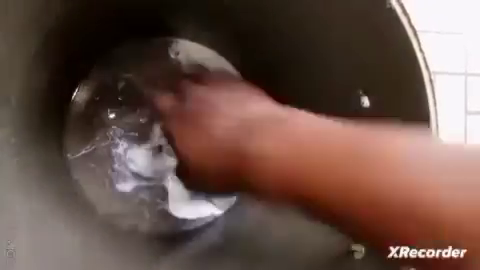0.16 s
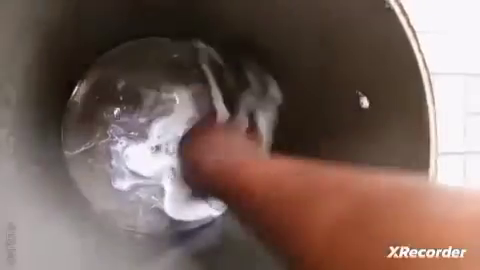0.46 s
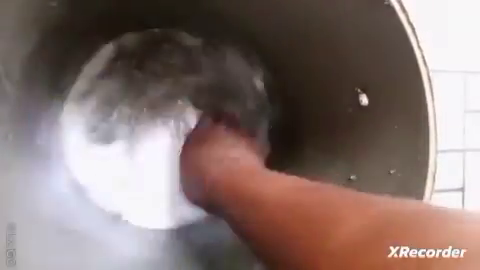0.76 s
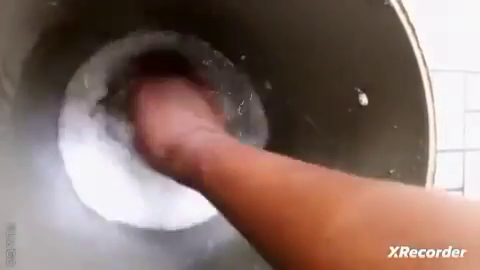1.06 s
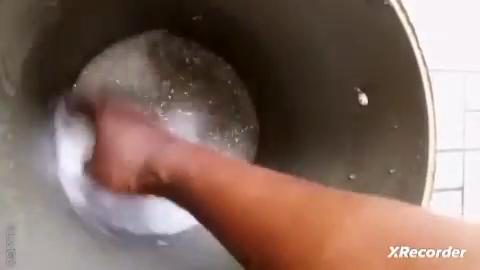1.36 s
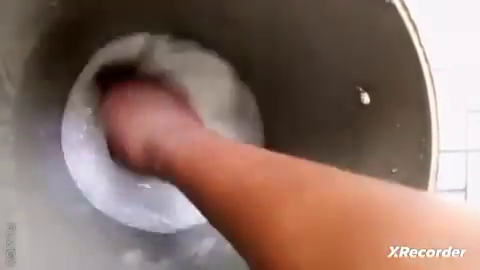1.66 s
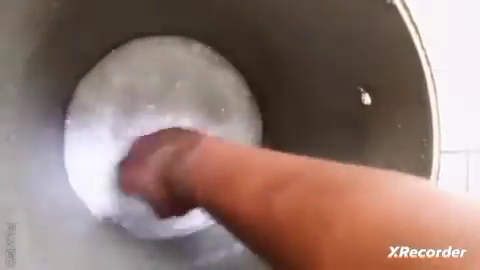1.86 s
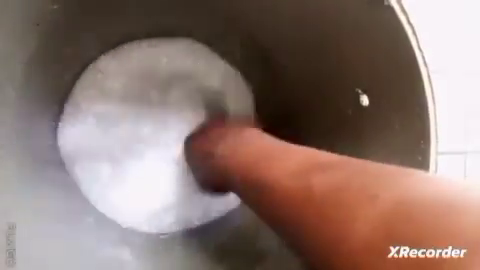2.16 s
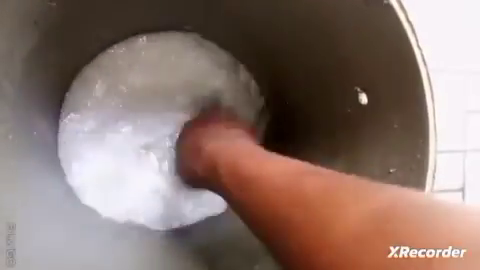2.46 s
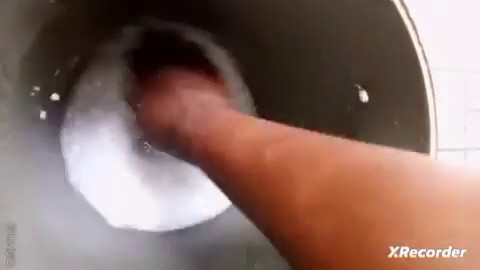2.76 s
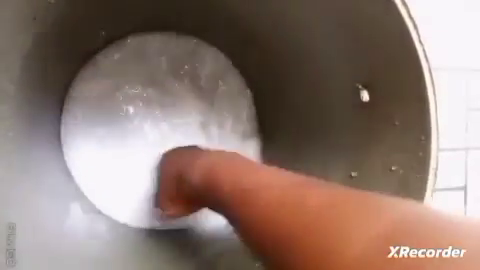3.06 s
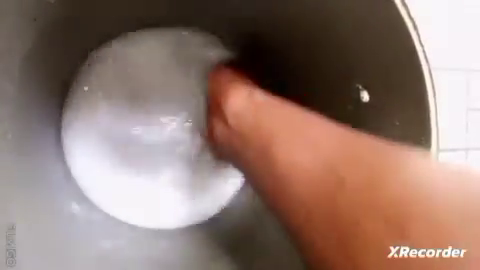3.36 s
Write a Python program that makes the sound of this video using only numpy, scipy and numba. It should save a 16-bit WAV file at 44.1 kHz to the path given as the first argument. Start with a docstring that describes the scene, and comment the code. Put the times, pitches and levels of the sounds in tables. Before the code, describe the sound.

Hand stirring shallow water in a bucket, bubbly sloshing and splashing with small hollow bumps

```python
"""Hand stirring water in a bucket

A hand plunges into shallow water in a plastic bucket and stirs: swarms and single glides of decaying sines chirp
and pop as bubbles, random clicks crackle as spray, and knuckles ring the bucket's modes; slosh keeps it booming.
Short wall echoes follow the bubbles. Faint outdoor noise and breathy tones, alone before the plunge, lie beneath."""
import sys
import numpy as np
from scipy import signal
from scipy.fft import rfft, irfft
from scipy.io import wavfile
from scipy.ndimage import uniform_filter1d, minimum_filter1d
from numba import njit

SR = 44100
rng = np.random.default_rng(int(sys.argv[2]) if len(sys.argv) > 2 else 0)


def boost(x):
    """Linear amplitude factor 10**(x/20) for a level x in decibels (scalar or array-like)."""
    u = np.asarray(x, float) / 20
    return 10 ** u


def store_pcm(level_fs):
    """Save levels as 16-bit WAV."""
    pcm = np.round(np.clip(level_fs, -1, 1) * 32767).astype(np.int16)
    wavfile.write(sys.argv[1], SR, np.atleast_2d(pcm).T)


N = 154350
PLUNGE_S, PLUNGE_RISE_S = 0.328, 0.003
GLIDE = 0.14  # pitch rise per third of t60, before its random factor


def unit(x):
    """Scale to rms 1."""
    return x / np.sqrt(np.mean(x ** 2))


def band(x, hz, width_hz):
    """Resonance of gain 1 at its centre."""
    return signal.lfilter(*signal.iirpeak(hz, hz / width_hz, fs=SR), x)


def colour(x, table):
    """Minimum-phase filter with the gain of (frequency [Hz], gain [dB]) points."""
    hz, db = np.array(table, float).T
    grid_hz = np.linspace(1, SR / 2, 2049)
    log_gain = np.interp(np.log(grid_hz), np.log(hz), db) * np.log(10) / 20
    cepstrum = irfft(log_gain)
    cepstrum[1:2048] *= 2  # fold the anticausal half forward
    cepstrum[2049:] = 0
    impulse = irfft(np.exp(rfft(cepstrum)))[:2048]
    return signal.fftconvolve(x, impulse)[:N]


def walk(rate_hz):
    """Random levels held 1 / rate_hz and slewed; rms 1."""
    hold = int(SR / rate_hz)
    steps = np.repeat(rng.standard_normal(N // hold + 1), hold)
    return unit(uniform_filter1d(steps, hold // 2)[:N])


def sizes(u, spread_db):
    """Uneven event sizes from uniform u: mostly small, a few large."""
    return boost(-spread_db * np.log(np.maximum(u, 0.01)))


def crackle(per_s, spread_db):
    """Single clicks of random time, sign and size; rms 1."""
    u = rng.random((N, 3))
    hit = u[:, 0] < per_s / SR
    sign = np.sign(u[:, 1] - 0.5)
    return unit(hit * sign * sizes(u[:, 2], spread_db))


def bursts(start_s, db, t60_s, rise_s):
    """Envelope that jumps at each event and decays exponentially."""
    hits = np.zeros(N)
    hits[(start_s * SR).astype(int)] = boost(db)
    decay = signal.lfilter([1], [1, -1000 ** (-1 / SR / t60_s)], hits)
    k = np.exp(-1 / (rise_s * SR))
    return signal.lfilter([1 - k], [1, -k], decay)


def level(table, column):
    """Gain along one dB column of a time table; silent before the plunge."""
    t, rows = np.arange(N) / SR, np.array(table)
    db = np.interp(t, rows[:, 0], rows[:, column])
    return boost(db) * np.clip((t - PLUNGE_S) / PLUNGE_RISE_S, 0, 1) ** 2


@njit
def rings(start, hz, t60, size, glide, onset, n, sr):
    """Decaying sines that swell with time constant onset and glide in pitch as they fade."""
    out = np.zeros(n)
    for e in range(len(start)):
        i0, m = int(start[e] * sr), int(t60[e] * sr) + 2
        turn = np.exp(2j * np.pi * hz[e] / sr - np.log(1000.) / m)  # rotation and decay per sample
        bend = np.exp(2j * np.pi * hz[e] * glide[e] * 3 / sr / m)
        z, swell = size[e] + 0j, 0.
        for i in range(max(i0, 0), min(i0 + m, n)):
            swell += (1 - swell) / (1 + onset * sr)
            out[i] += swell * z.imag
            z *= turn
            turn *= bend
    return out


def ring(start_s, hz, t60_s, size, glide, onset_s):
    """One decaying sine per row; for glide > 0 most rise in pitch, some sag."""
    glides = glide * rng.uniform(-0.8, 1.2, len(hz))
    t60_s = np.clip(t60_s, 0.001, 1.)
    return rings(1. * start_s, 1. * hz, t60_s, 1. * size, glides, onset_s, N, float(SR))


# churning water: (time [s], large bubbles [dB], small bubbles [dB], spray treble [dB])
STIR = [(0.34, -15.5, -22, -59), (0.375, -28, -18.5, -32), (0.412, -34, -13.5, -40),
        (0.43, -25.5, -25.5, -52), (0.52, -17.5, -18.5, -44), (0.72, -21, -15, -42),
        (0.9, -26.5, -25.5, -48.5), (1.05, -25.5, -19, -44), (1.35, -24, -21.5, -47.5),
        (1.52, -25, -20.5, -44), (1.66, -24, -21.5, -49), (1.78, -27, -20, -45), (1.9, -31, -27, -50),
        (2.02, -16, -21, -49.5), (2.12, -34.5, -27, -59), (2.2, -22, -24, -51.5),
        (2.37, -19.5, -22.5, -52.5), (2.42, -41.5, -38, -54), (2.55, -30, -27.5, -57.5),
        (2.65, -28, -19.5, -42), (2.85, -18.5, -21, -47), (2.92, -28, -29, -55), (3.08, -18, -16, -39),
        (3.225, -27, -24, -46.5), (3.29, -39.5, -33.5, -61), (3.35, -28.5, -26.5, -37.5),
        (3.4, -31.5, -38, -74), (3.5, -30, -22, -60)]
# colour of water through bucket and microphone: (frequency [Hz], density [dB per Hz])
WATER = [(240, -56.5), (400, -14), (584, -15), (782, -2), (918, -5), (1000, 0.5), (1190, -7.5), (1440, 0.5),
         (2140, -4.5), (3350, 2), (4050, -3), (7470, -35), (13000, -35.5)]


def swarm(per_s, t60_cycles, spread_db, onset_s):
    """Random bubbles ring at their pitch; large and small follow their own churning levels."""
    u = rng.random((int(per_s * N / SR), 4))
    i = (u[:, 0] * N).astype(int)
    hz = 550 * 11.74 ** u[:, 1]
    t60_s = t60_cycles / hz * (0.56 + u[:, 3])
    size = hz ** 1.134 * sizes(u[:, 2], spread_db)
    clumps = boost(3.5 * walk(40))  # shared by all sizes
    large = level(STIR, 1) * clumps * boost(2)
    small = level(STIR, 2) * clumps
    stirred = size * np.where(hz < 1800, large[i], small[i])
    steady = colour(ring(i / SR, hz, t60_s, size, GLIDE, onset_s), WATER)  # level reference
    return colour(ring(i / SR, hz, t60_s, stirred, GLIDE, onset_s), WATER) / np.std(steady)


def churn():
    """Ringing bubbles over a fizz of brief pops, high-passed."""
    ringing = swarm(per_s=2500, t60_cycles=33, spread_db=3.5, onset_s=0.0012)
    fizz = swarm(per_s=5000, t60_cycles=3, spread_db=2, onset_s=0.0001)
    foam = boost(2.5) * ringing + boost(-7) * fizz
    return signal.sosfilt(signal.butter(6, 643, "high", fs=SR, output="sos"), foam)


# loud bubbles: (time [s], level [dB], pitch [Hz])
BUBBLES = [(0.329, -7, 1746), (0.342, -10, 1480), (0.371, -8, 1790), (0.393, 2.5, 3320), (0.487, -7.5, 800),
           (0.521, -5.5, 792), (0.623, -1, 3150), (0.711, -8.5, 686), (0.762, -7, 3080), (0.828, -10, 775),
           (0.846, -3.5, 975), (0.918, -14, 1400), (0.959, 5.5, 3120), (1.003, -2.5, 2286),
           (1.058, -1.5, 3400), (1.116, -3.5, 3290), (1.138, 1, 3300), (1.177, -6, 3960), (1.218, -7, 2870),
           (1.238, -0.5, 3300), (1.28, -2.5, 3580), (1.309, -11, 757), (1.332, -4.5, 2225),
           (1.433, -2, 1700), (1.475, -12, 3350), (1.518, -4.5, 3850), (1.56, -3.5, 2500),
           (1.596, -6.5, 2510), (1.63, 2, 3790), (1.695, -5.5, 3400), (1.711, -5, 1936), (1.746, 1, 3265),
           (1.78, -2, 3360), (1.848, -4.5, 3670), (1.972, -9, 1000), (1.995, -17.5, 1110),
           (2.141, 1.5, 2950), (2.226, -1, 2800), (2.265, 0, 2390), (2.374, 3, 2940), (2.402, -5.5, 3700),
           (2.477, -11, 4580), (2.513, -7, 2020), (2.628, -2, 3580), (2.708, -7.5, 3370), (2.8, -6, 1470),
           (2.826, -9, 1020), (2.88, 2.5, 3095), (3.028, -3, 1540), (3.101, 2, 2750), (3.118, -2, 2100),
           (3.188, -11, 3176), (3.309, -15.5, 4060), (3.332, -5.5, 3400), (3.423, -5, 2810)]


def bubbles():
    """Each loud bubble rings with a slap of water and a splash of weaker neighbours that thins out."""
    s, db, hz = np.array(BUBBLES).T
    t60_s = 54 / np.sqrt(hz * 3000)  # 54 cycles at 3 kHz, more above
    loud = ring(s + 0.001053, hz, t60_s, boost(db + 6), GLIDE, 0.002)

    u = rng.random((len(s), 12, 3))
    octaves = 1.2 * (2 * u[..., 0] - 1)
    near_hz = np.clip(hz[:, None] * 2 ** octaves, 600, 4500 + 500 * u[..., 2]).ravel()
    late = u[..., 1] ** 1.5
    near_s = (s[:, None] + 0.001002 + 0.02 * late).ravel()
    near_db = (db[:, None] - 7.5 - 6.8 * u[..., 2] - 8.3 * late).ravel()

    slap = unit(band(colour(crackle(6000, 1.6), WATER), 2600., 3500.))
    slap = slap * bursts(s + 0.00106, db - 11.5, t60_s=0.038, rise_s=0.00062)
    splash = ring(near_s, near_hz, 22 / near_hz, boost(near_db), GLIDE, 0.00085)
    return loud + slap + splash


def walls(x):
    """Dense, decaying random echoes inside the bucket, added to the direct sound."""
    t = np.arange(4000) / SR
    tail = rng.standard_normal(len(t)) * 1000 ** (-t / 0.055) * (t > 0.0015)  # t60 0.055 s
    tail = tail / np.sqrt(np.sum(tail ** 2))
    return x + boost(-7.5) * signal.fftconvolve(x, tail)[:N]


# knuckles bump the bottom: (time [s], level [dB], hardness as lift of the upper modes [dB])
BUMPS = [(0.348, -24, 19.5), (0.487, -18.5, 18), (0.847, -17.5, 14), (0.922, -25, 7), (0.99, -21.5, -15),
         (1.236, -15.5, 9), (1.726, -10.5, 13), (1.967, -27, 3), (2.022, -24.5, 10), (2.281, -24, 11),
         (2.487, -16, -31), (2.619, -12, -3), (3.343, -29, -8)]
# modes of the bucket: (frequency [Hz], level [dB], t60 [s])
BUCKET = [(193, -23, 0.31), (244.9, 2, 0.19), (308, -8, 0.11), (405, -7, 0.059), (483.5, -11, 0.069),
          (734, -12.5, 0.062)]
# boom as water slops against the bucket: (time [s], level [dB])
BOOM = [(.34, -30), (.55, -27), (.74, -33.5), (.78, -41), (1.0, -38.5), (1.12, -48), (1.18, -55),
        (1.27, -36), (1.6, -36.5), (1.66, -54), (1.78, -30.5), (1.86, -72), (1.92, -51.5), (2.07, -24),
        (2.12, -43.5), (2.3, -30.5), (2.45, -45.5), (2.52, -39.5), (2.6, -46.5), (2.8, -33.5), (2.92, -39),
        (3.0, -26.5), (3.22, -40), (3.28, -71), (3.36, -35.5), (3.44, -59)]


def bucket():
    """Bumps ring all modes as decaying sines; slosh clicks keep the lowest five resonating."""
    s, db, hard_db = np.array(BUMPS).T
    bumps = 0
    for k, (hz, mode_db, t60_s) in enumerate(BUCKET):
        hit_hz = hz * (1 + 0.038 * rng.standard_normal(len(s)))
        hit_db = db - 1 + mode_db + (k > 1) * hard_db
        bumps = bumps + ring(s - 0.004, hit_hz, t60_s + 0 * s, boost(hit_db), 0, 0.0083)
    slosh = crackle(900, 3.4)
    boom = 0
    for (hz, mode_db, t60_s), lift_db in zip(BUCKET, (6.5, 2, 5, -4, -1)):
        resonance = band(band(slosh, hz, 6 / t60_s), hz, 14 / t60_s)
        boom = boom + boost(mode_db + lift_db) * resonance
    return bumps + unit(boom) * level(BOOM, 1)


# bursts of spray against the wall: (time [s], level [dB])
SPRAY = [(0.3423, -32), (0.581, -15.5), (0.643, -18), (1.0053, -16.5), (1.25, -19), (1.35, -22),
         (2.0344, -16), (2.0993, -24), (2.144, -18.5), (2.3318, -19), (2.402, -18), (2.6266, -22),
         (2.865, -23)]
# ticks of fine drops: (frequency [Hz], level [dB])
DROPLETS = [(6300, 7), (8700, -1), (9500, -2), (10500, -4), (12300, 0.5)]


def spray():
    """Fine droplets: a crackling bed and sudden bursts, lifted by the microphone port."""
    s, db = np.array(SPRAY).T
    puffs = bursts(s, db - 15.5, t60_s=0.048, rise_s=0.0023)
    port = signal.butter(3, (14370, 15740), "band", fs=SR, output="sos")
    top = unit(signal.sosfilt(port, crackle(6800, 3.1))) * boost(4 * walk(45))
    middle = 0
    for hz, drop_db in DROPLETS:
        ticks = band(band(crackle(900, 1.6), hz, hz / 12), hz, hz / 6)
        middle = middle + ticks * boost(drop_db + 5.4 * walk(35))
    return (top + boost(-6.5) * unit(middle)) * (level(STIR, 3) + puffs)


def breath(hz):
    """Noise through two resonances: a breathy tone of rms 1."""
    return unit(band(band(rng.standard_normal(N), hz, 74), hz, 148))


# outdoor noise: (frequency [Hz], density [dB per Hz])
AIR = [(30, -19), (85, -10.5), (400, -19), (680, -29), (2400, -38), (3600, -38), (5000, -41), (8000, -78)]
# wavering outdoor tones: (time [s], lower tone [dB], upper tone [dB])
TONES = [(0, -70, -51), (.04, -68, -55.5), (.13, -79, -60.5), (.21, -52, -61), (.26, -59, -60),
         (.3, -57, -57)]


def air():
    """Faint coloured noise and breathy tones; fainter overtones swell with the lower tone."""
    t = np.arange(N) / SR
    tone_s, low_db, high_db = np.array(TONES).T
    low_db, high_db = np.interp(t, tone_s, low_db), np.interp(t, tone_s, high_db)
    tones = breath(1063) * boost(low_db) + breath(1815) * boost(high_db)
    overtones = sum(breath(hz) for hz in (2220, 2450, 3400)) * boost(low_db - 16.5)
    return unit(colour(rng.standard_normal(N), AIR)) * boost(-61) + tones + overtones


def channel_noise():
    """Faint treble noise, opposite in sign in the two channels, its level tied to a STIR column."""
    noise = band(band(rng.standard_normal(N), 10100, 8100.), 10100, 9100.)
    return unit(noise) * level(STIR, 2) * boost(-39)


def scene():
    """One microphone feeds both channels; faint treble noise is added to one, subtracted from the other."""
    water = walls(churn() + bubbles()) * boost(-2.5)
    mono = water + spray() + bucket() + air()
    noise = channel_noise()
    return np.array([mono + noise, mono - noise])


def top_cut(x):
    """Nothing passes above the cut-off."""
    return signal.sosfilt(signal.butter(12, 16850, fs=SR, output="sos"), x)


def record(dry):
    """The microphone cuts the deepest bass and the top; a quick limiter holds the peaks."""
    x = signal.sosfilt(signal.butter(2, 40.3, "high", fs=SR, output="sos"), dry)
    x = signal.sosfilt(signal.ellip(10, 0.2, 60, 15950, fs=SR, output="sos"), x)
    ceiling, window = 0.8, int(0.0013 * SR)
    gain = np.minimum(1, ceiling / (np.abs(x).max(axis=0) + 1e-9))
    gain = uniform_filter1d(minimum_filter1d(gain, window), window)
    return top_cut(x * gain)


dry = scene()
out = record(dry)
store_pcm(out)
```